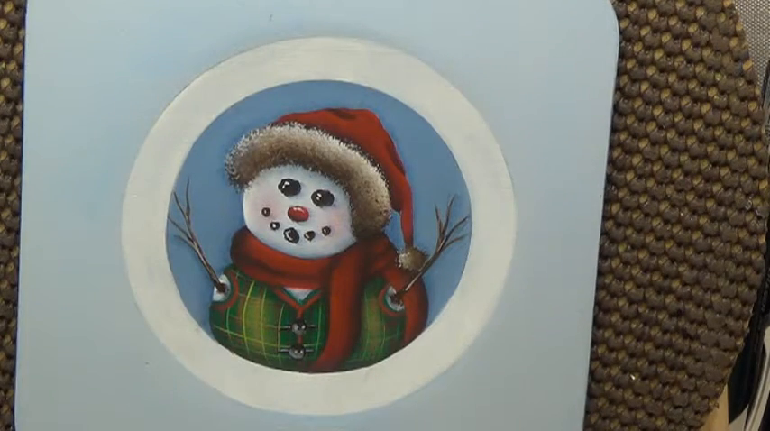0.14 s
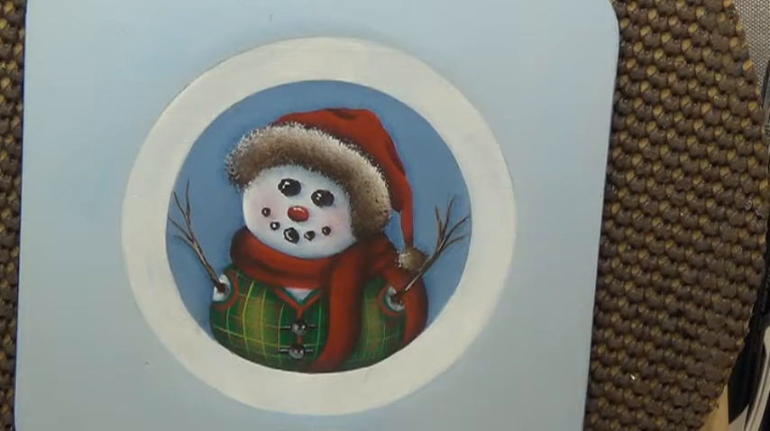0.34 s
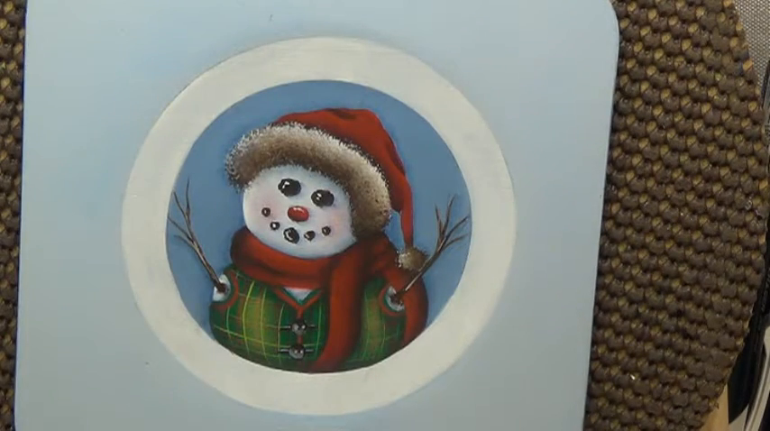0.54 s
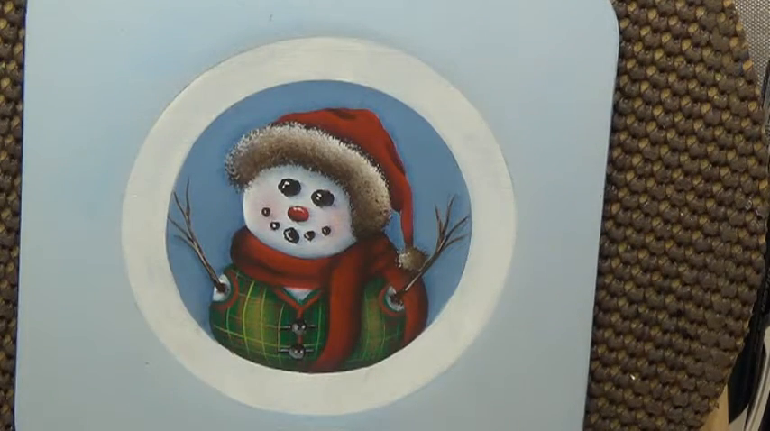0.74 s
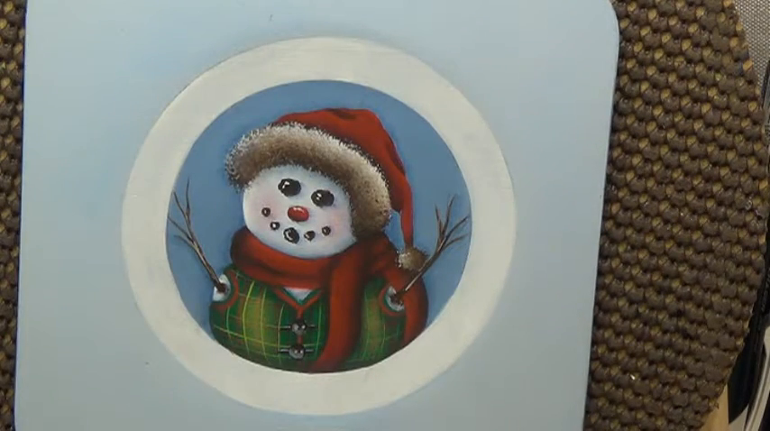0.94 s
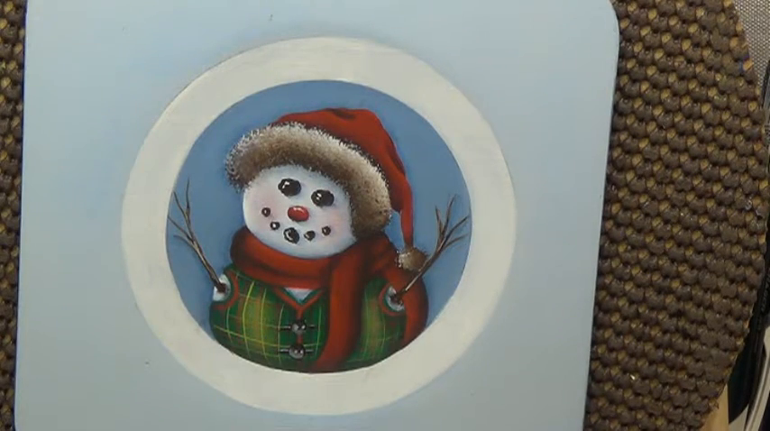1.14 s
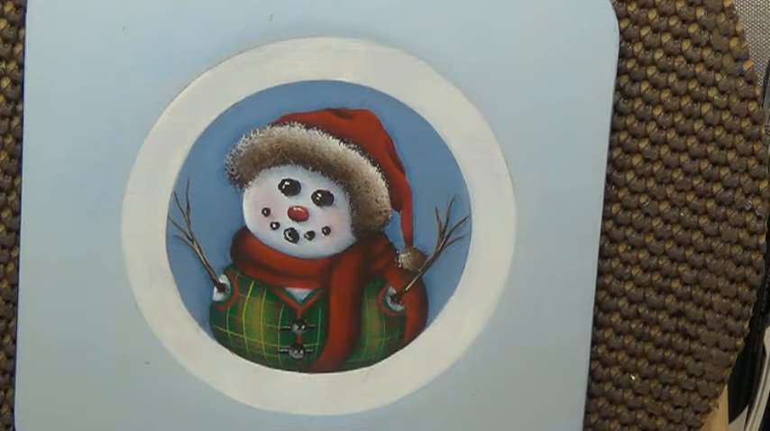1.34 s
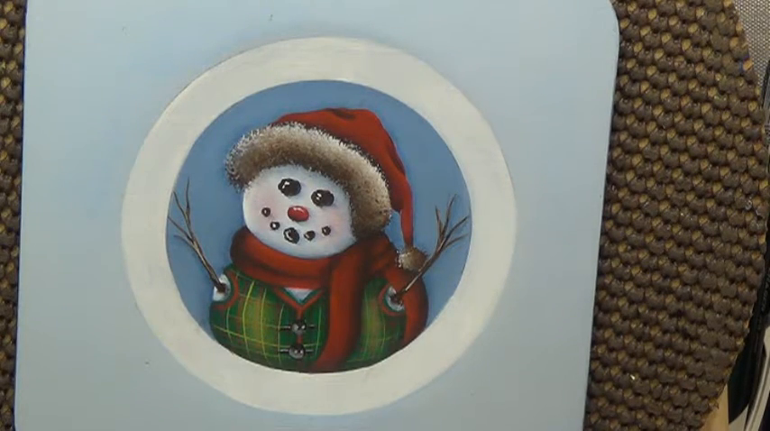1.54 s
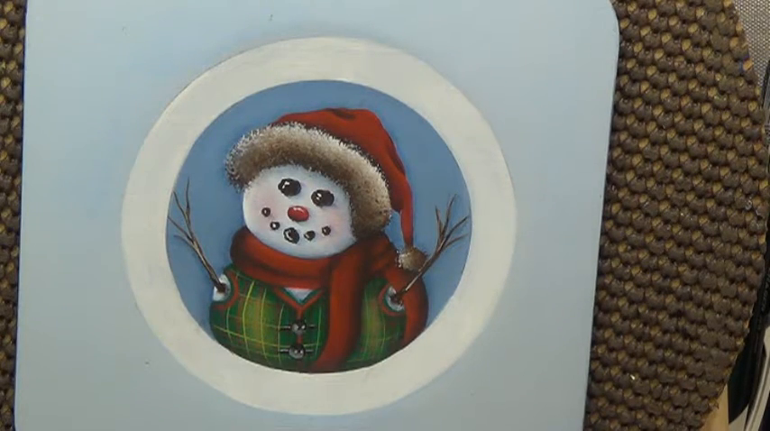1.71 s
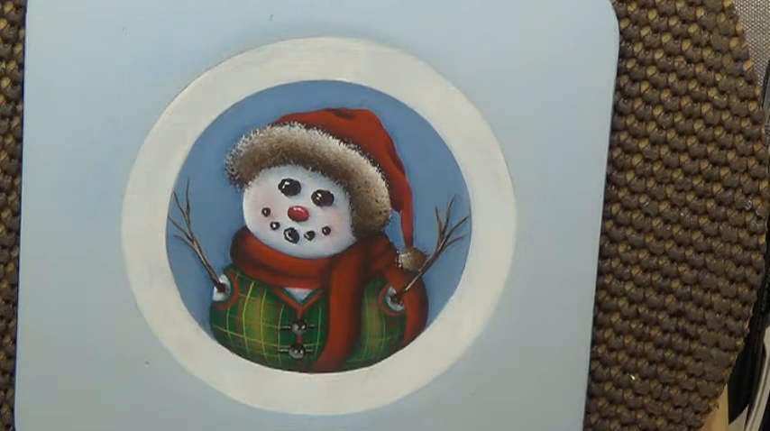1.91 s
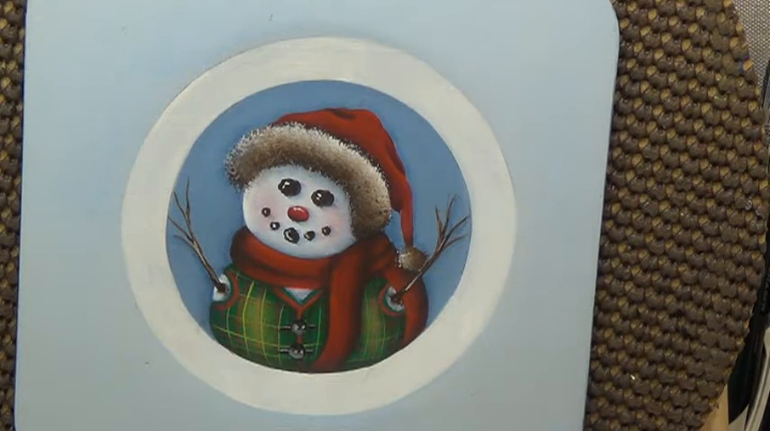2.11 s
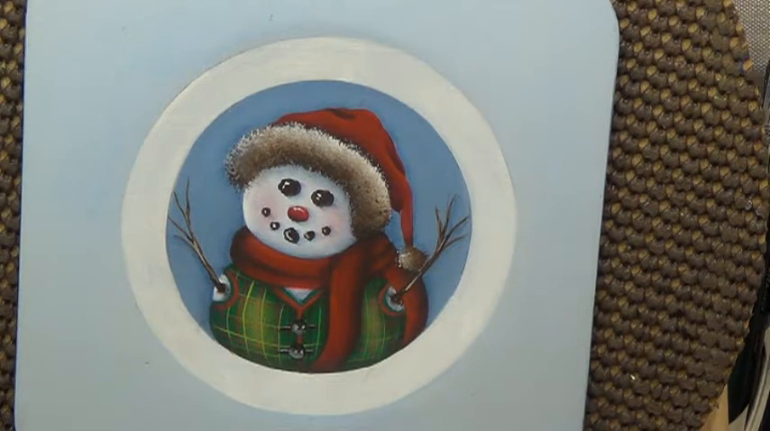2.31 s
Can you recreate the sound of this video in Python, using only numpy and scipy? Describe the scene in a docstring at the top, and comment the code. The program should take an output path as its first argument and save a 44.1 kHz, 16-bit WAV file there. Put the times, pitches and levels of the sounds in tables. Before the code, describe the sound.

Water sloshes and plops as a paintbrush is rinsed twice, followed by three dull bumps.

```python
"""A small room, where a paintbrush is rinsed in a container of water in two short runs.
First it is swished hard: the water throbs, gurgles and spatters as swarms of bubbles ring. Then it is
shaken lightly, with plops and sharp knocks of the handle ringing the container wall. Foam fizzes out and
three dull bumps of the brush follow, over faint hiss, hum and a thin electrical whine."""
import sys
import numpy as np
from scipy import signal
from scipy.fft import rfft, irfft, next_fast_len
from scipy.io import wavfile

SR = 44100
rng = np.random.default_rng(int(sys.argv[2]) if len(sys.argv) > 2 else 0)


def store_pcm(level_fs):
    """Save levels as 16-bit WAV."""
    pcm = np.round(np.clip(level_fs, -1, 1) * 32767).astype(np.int16)
    wavfile.write(sys.argv[1], SR, np.atleast_2d(pcm).T)


N = 108750

# spectrum of the finest bubbles, in spray and foam (frequency [Hz], level [dB])
FINE_BUBBLE_TONE = [(2700, -3), (3600, 1.5), (5000, -4.5), (5700, -4.5), (7000, -5), (9000, -14),
                    (12500, -7.5)]


def undb(db):
    return 10 ** (np.asarray(db) / 20)


def unit(x):
    """Scale to rms 1."""
    return x / np.sqrt(np.mean(x ** 2))


def at(hz, points):
    """Read (frequency [Hz], value) points on a log axis."""
    freqs, values = np.array(points, float).T
    return np.interp(np.log(np.maximum(hz, 1)), np.log(freqs), values)


def colour(x, points):
    """Equalise by (frequency [Hz], gain [dB]) points."""
    size = next_fast_len(len(x) + SR // 8)
    gain = undb(at(np.fft.rfftfreq(size, 1 / SR), points))
    return irfft(rfft(x, size) * gain, size)[:len(x)]


def fade(t, t60):
    return np.exp(-np.log(1000) * t / t60)


def add(out, start, x):
    """Mix x in at a time in s."""
    i = max(int(start * SR), 0)
    out[i:i + len(x)] += x[:max(len(out) - i, 0)]


def ring(t, hz, t60, rise_s, glide=0):
    """A fading sine with a soft attack; its pitch climbs by the fraction glide per t60."""
    t = np.maximum(t, 0)
    bend = 1 + glide * np.minimum(t / t60, 2) / 2
    return np.sin(2 * np.pi * hz * t * bend) * fade(t, t60) * (1 - np.exp(-t / rise_s))


def burst(t, t60, lo_hz, hi_hz):
    """A short puff of band-limited noise."""
    band = signal.butter(3, [lo_hz, min(hi_hz, SR / 2 - 1000)], "band", fs=SR, output="sos")
    puff = rng.standard_normal(len(t)) * fade(t, t60)
    return signal.sosfilt(band, puff) * np.sqrt(SR / 2 / (hi_hz - lo_hz))


def band_noise(lo_hz, hi_hz):
    """Steady noise in one band, rms 1."""
    band = signal.butter(2, [lo_hz, hi_hz], "band", fs=SR, output="sos")
    return unit(signal.sosfilt(band, rng.standard_normal(N)))


def bubbles(rate, tone, envelope, cycles, scatter_db, glide):
    """A swarm of random-sized bubbles, rate a second, riding a (time [s], level [dB]) envelope."""
    out = np.zeros(N)
    lo_hz, hi_hz = tone[0][0], tone[-1][0]
    for k, (when, pitch, strength, life) in enumerate(rng.random((int(rate * N / SR), 4))):
        hz = lo_hz * (hi_hz / lo_hz) ** pitch
        t60 = cycles * (.5 + life) / hz
        t = np.arange(int(t60 * SR) + 2) / SR
        db = at(hz, tone) - scatter_db * np.log(max(strength, .03))
        gain = undb(db) * np.sqrt(hz)  # makes up for the shorter ring of small bubbles
        add(out, (k + 2 * when) / rate, gain * ring(t, hz, t60, .5 / hz, glide))
    times, levels = np.transpose(envelope)
    return unit(out) * undb(np.interp(np.arange(N) / SR, times, levels, left=-120, right=-120))


def background():
    """A bed of faint hiss, wavering hum and thin electrical whine."""
    # hiss spectrum (frequency [Hz], level [dB])
    hiss_tone = [(18, -49), (30, -22), (118, 1.5), (280, -7), (600, -2), (1280, -10), (1500, -7),
                 (2830, -13), (3220, -13.5), (3980, -16), (4910, -12), (13700, -16), (16000, -41)]
    mid, side = (unit(colour(rng.standard_normal(N), hiss_tone)) for _ in range(2))
    hiss = mid + undb(-13) * side * np.array([[1], [-1]])
    hum = band_noise(113, 129)
    waver = 1 + .12 * band_noise(3, 40)
    whine = waver * np.sqrt(2) * np.sin(2 * np.pi * 15734 * np.arange(N) / SR)
    return undb(-55.5) * hiss + undb(-62.5) * hum + undb(-55) * whine


def gurgle():
    """Big bubbles stirred under by the brush ring low, with hardly any bend in pitch."""
    # surges of the gurgle (time [s], level [dB])
    surges = [(0, -39), (0.111, -38.5), (.15, -70), (0.174, -28.5), (.22, -42), (.28, -35), (0.337, -73),
              (0.363, -34), (0.449, -40.5), (.49, -61), (0.514, -37.5), (.6, -47.5), (.645, -57),
              (.69, -37), (.81, -48), (0.848, -38), (.89, -50), (.925, -36.5), (.965, -44), (1.01, -64),
              (1.27, -75), (1.3, -44.5), (1.42, -51), (1.52, -53.5), (1.8, -57.5)]
    # spectrum of the big bubbles (frequency [Hz], level [dB])
    tone = [(190, 4), (260, -22.5), (350, 7.5), (410, 8.5), (450, -12), (510, 9), (620, -4.5), (760, -3.5)]
    return undb(-2) * bubbles(500, tone, surges, cycles=44, scatter_db=2.5, glide=0.019)


def splashes():
    """Mid-sized bubbles chirp upward as the water sloshes, with a bright spray on top."""
    # envelopes of both runs (time [s], slosh level [dB], spray level [dB])
    swishes = [(0, -42.5, -62), (0.024, -33, -30.5), (.06, -41, -40), (0.094, -28.5, -34.5),
               (.15, -52, -84), (.18, -41.5, -45.5), (.21, -34.5, -51), (.255, -36, -38.5),
               (0.34, -54, -62.5), (0.376, -34.5, -38), (.398, -43, -60), (0.416, -39, -39),
               (.485, -48.5, -58), (.52, -47, -50), (0.538, -29, -39.5), (0.57, -45, -46.5),
               (0.61, -37, -39), (0.648, -50.5, -54.5), (0.762, -35, -44), (.80, -45, -60),
               (0.868, -28.5, -38), (0.899, -42.5, -53), (.93, -36, -41.5), (0.987, -33, -40),
               (1.04, -67, -66), (1.276, -75, -63.5), (1.293, -27, -43), (1.34, -57, -82),
               (1.392, -43, -50), (1.445, -47.5, -63), (1.525, -39, -47.5), (1.591, -45.5, -54.5),
               (1.622, -46.5, -40), (1.655, -52, -57.5), (1.687, -32.5, -36), (1.718, -38.5, -58),
               (1.745, -37.5, -40), (1.785, -39.5, -53.5), (1.83, -77, -62)]
    # spectrum of the sloshing bubbles (frequency [Hz], level [dB])
    slosh_tone = [(700, -2.5), (920, 2), (1170, 2), (1400, -1.5), (1700, -4.5), (2000, 0), (2600, -16)]
    times, slosh_db, spray_db = np.transpose(swishes)
    slosh = bubbles(900, slosh_tone, np.c_[times, slosh_db], cycles=30.3, scatter_db=2, glide=0.16)
    spray = bubbles(2500, FINE_BUBBLE_TONE, np.c_[times, spray_db], cycles=35, scatter_db=3, glide=0.098)
    return undb(-0.5) * slosh + undb(1.7) * spray


def strokes():
    """Each stroke heaves the water: a few low cycles that swell and die amid rough churning."""
    # throbs of the water (crest time [s], pitch [Hz], level [dB])
    throbs = [(.008, 126, -29), (0.092, 116, -44.5), (0.188, 127, -30.5), (0.273, 165, -32.5),
              (0.3, 144, -32.5), (0.361, 130, -29.5), (0.439, 160, -28), (0.468, 173, -37.5),
              (0.521, 130, -28.5), (0.596, 137, -27), (0.687, 131.3, -24.5), (.80, 150, -33.5),
              (0.85, 144, -26.5), (.923, 157, -26), (0.96, 182, -44.5)]
    swell_s, pitch_rise_per_s = 0.012, 1.3
    out, churn = np.zeros(N), undb(-14) * band_noise(98, 271)
    for crest, hz, db in throbs:
        t = np.arange(N) / SR - crest
        heave = np.sin(2 * np.pi * (hz * t * (1 + pitch_rise_per_s * t / 2) + rng.random()))
        out += undb(db) * np.exp(-(t / swell_s) ** 2) * (heave + churn)
    return out


def knocks():
    """The handle cracks against the wall and rings; the spot it hits favours low or high wall modes."""
    # handle hits (time [s], level [dB], low modes [dB], high modes [dB], handle ring [dB])
    hits = [(0.0349, -20.5, -11, 11, -22), (0.209, -21.5, -18, -7, -12), (0.2435, -25, -16, 5.5, 1),
            (0.3694, -32.5, -6, 19.5, -15), (0.415, -32.5, 22.5, -3, -27), (.5315, -33.5, 7, 14, -19),
            (.926, -28.5, 7, 3, -10), (.960, -25, 22, 12.5, -3), (1.282, -13.5, -16, 0.5, -2),
            (1.5019, -20, 5, 1, -13), (1.725, -16, 0, 0.5, -26), (1.8709, -13, -3, -5, 3)]
    # modes of the container wall (frequency [Hz], level [dB], t60 [s])
    wall_modes = [(393, -27.5, 0.048), (758, -21.5, 0.058), (919, -8, 0.051), (1170, 0.5, 0.029),
                  (1500, 1, 0.016), (1760, -9, 0.03), (2140, 1.5, 0.0077), (3115, -6, 0.029),
                  (3810, -3, 0.017), (4430, -12.5, 0.046), (4850, -10.5, 0.02), (6180, -43.5, 0.041),
                  (6350, -28.5, 0.034), (8680, -41, 0.0099)]
    low_edge_hz, high_edge_hz = (670, 1420), (3350, 3820)
    max_lag_s, detune = 0.000857, .012
    out, t = np.zeros(N), np.arange(SR // 8) / SR
    for start, db, low_db, high_db, handle_db in hits:
        crack = undb(-3.5 + high_db / 2) * burst(t, t60=0.023, lo_hz=600, hi_hz=6480)
        handle = undb(handle_db) * ring(t, hz=2646, t60=0.029, rise_s=0.0012)
        hit = crack + handle
        for k, (hz, mode_db, t60) in enumerate(wall_modes):
            spot_db = np.interp(hz, low_edge_hz, [low_db, 0]) + np.interp(hz, high_edge_hz, [0, high_db])
            lag = max_lag_s * rng.random()
            mode = ring(t - lag, hz * (1 + detune * rng.standard_normal()), t60, rise_s=0.000084)
            hit += (-1) ** k * undb(mode_db + spot_db) * mode
        add(out, start, undb(db) * hit)
    return out


def plops():
    """Each bubble snaps shut and rings briefly, rising in pitch; the smallest are mostly snap."""
    # single bubbles and drops (time [s], pitch [Hz], level [dB], t60 [s])
    drops = [(.085, 3550, -24.5, 0.093), (.172, 504, -28.5, 0.055), (.189, 805, -20, 0.039),
             (0.21, 7530, -28, 0.022), (0.211, 1032, -22, 0.081), (0.369, 7430, -21, 0.017),
             (.376, 897, -26, 0.044), (0.422, 5070, -25, 0.021), (0.456, 1980, -29.5, 0.046),
             (0.459, 3750, -22.5, 0.012), (0.488, 1274, -28.5, 0.05), (.489, 4670, -28.5, 0.021),
             (0.533, 6730, -22.5, 0.025), (0.6049, 1162, -16.5, 0.044), (.55, 341, -31.5, 0.15),
             (0.586, 358, -27, 0.12), (0.696, 880, -27.5, 0.048), (.708, 3620, -30, 0.04),
             (.746, 8100, -26, 0.023), (0.764, 1130, -18.5, 0.019), (.810, 1200, -22.5, 0.028),
             (0.856, 1163, -27.5, 0.08), (.869, 1310, -27, 0.023), (.893, 4900, -27.5, 0.068),
             (1.318, 1130, -20, 0.032), (1.283, 808, -27, 0.12), (1.304, 2710, -21, 0.029),
             (1.354, 1826, -7.5, 0.02), (1.361, 2170, -17, 0.023), (1.389, 1323, -20.5, 0.026),
             (1.397, 1310, -21.5, 0.023), (1.401, 9900, -35, 0.016), (1.4116, 4780, -19.5, 0.016),
             (1.42, 3500, -26, 0.028), (1.424, 936, -26.5, 0.047), (1.465, 1413, -18, 0.057),
             (1.473, 1210, -12, 0.019), (1.504, 1170, -10.5, .032), (1.5595, 1700, -14, 0.021),
             (1.616, 1786, -18.5, .028), (1.55, 9700, -36, 0.014), (1.570, 9000, -39, 0.014),
             (1.629, 7670, -30.5, 0.012), (1.637, 979, -21.5, 0.057), (1.671, 1450, -22, 0.033),
             (1.676, 1800, -19, 0.05), (1.697, 3166, -29, 0.047), (1.779, 2160, -23, 0.021)]
    # how much of a bubble is snap (pitch [Hz], share of energy [0-1])
    snap_share = [(1500, .08), (3500, .25), (7500, .7)]
    out, t = np.zeros(N), np.arange(SR // 8) / SR
    for start, hz, db, t60 in drops:
        share = at(hz, snap_share)
        snap = np.sqrt(share) * burst(t, t60, hz * 0.77, hz * 1.29)
        chirp = 1.006 * np.sqrt(1 - share) * ring(t, hz, t60, rise_s=0.00055, glide=0.078)
        add(out, start, undb(db) * (chirp + snap))
    return out


def foam():
    """Last drips and bursting foam leave a fine fizz after the second run."""
    # the fizz dying away (time [s], level [dB])
    fizz = [(1.80, -54), (1.9, -55.5), (2.02, -56.5), (2.14, -62), (2.32, -62.5), (2.46, -68)]
    return undb(-1.5) * bubbles(600, FINE_BUBBLE_TONE, fizz, cycles=20, scatter_db=5, glide=0.07)


def bumps():
    """Soft blows of the brush ring only low modes, with a faint tick of contact."""
    # dull blows (time [s], level [dB])
    blows = [(2.109, -16), (2.277, -18), (2.4555, -18.5)]
    # body of a bump (frequency [Hz], level [dB], t60 [s], delay [s])
    low_modes = [(115, -23, 0.17, 0.0097), (199, -7, 0.061, 0.00099), (354, 1.5, 0.071, .005),
                 (483, 6.5, 0.024, 0.00011), (560, -5, 0.039, 0), (704, -9.5, 0.037, 0.012),
                 (806, -9, 0.027, 0.0017), (983, -6.5, 0.023, 0.0024)]
    # the soft contact passes little treble (frequency [Hz], gain [dB])
    soft_contact = [(1100, 0.5), (1500, 3), (3000, -25)]
    out, t = np.zeros(N), np.arange(SR // 3) / SR
    for start, db in blows:
        body = sum(undb(mode_db) * ring(t - delay, hz, t60, rise_s=0.0015)
                   for hz, mode_db, t60, delay in low_modes)
        tick = undb(-25.5) * burst(t, t60=0.043, lo_hz=670, hi_hz=8400)
        add(out, start, undb(db) * (colour(body, soft_contact) + tick))
    return out


def room_tail():
    """The room's short diffuse tail: noise that dies at its own rate in each band."""
    # reverb bands (centre [Hz], level [dB], t60 [s])
    bands = [(150, -13, 0.22), (386, -10.5, 0.17), (990, -13, 0.19), (2530, -11.5, 0.18),
             (4160, -16.5, 0.28), (7000, -14, 0.21), (11900, -6.5, 0.21)]
    predelay_s, build_s = 0.006, 0.01
    t = np.arange(SR // 2) / SR
    onset = np.clip((t - predelay_s) / build_s, 0, 1)
    out, centres = 0, [row[0] for row in bands]
    spectrum, freqs = rfft(rng.standard_normal(len(t))), np.fft.rfftfreq(len(t), 1 / SR)
    for share, (_, db, t60) in zip(np.eye(len(bands)), bands):
        noise = irfft(spectrum * at(freqs, list(zip(centres, share))), len(t))
        shape = fade(t, t60) * onset
        out = out + undb(db) * noise * shape / np.sqrt(np.sum(shape ** 2))
    return out


def place(source, balance):
    """Set a source in the room: wall echoes, a diffuse tail and its lean between the channels."""
    # early reflections off nearby walls (delay [s], level [dB])
    echoes = [(0.0185, -20.5), (0.03, -18.5), (.049, -33)]
    # their dull tone (frequency [Hz], gain [dB])
    echo_tone = [(500, 3.5), (1200, -16.5), (4000, -23)]
    width_db = -21.5
    near, dull = source.copy(), colour(source, echo_tone)
    for delay, db in echoes:
        add(near, delay, undb(db) * dull)
    mid, side = (signal.fftconvolve(source, room_tail())[:N] for _ in range(2))
    channels = []
    for sign in (1, -1):
        lean = [(hz, sign * db / 2) for hz, db in balance]
        channels.append(colour(near + mid + sign * undb(width_db) * side, lean))
    return np.array(channels)


def scene():
    """The container stands a little to the right, close to the microphone."""
    # panning of the knocks and bumps (frequency [Hz], left minus right [dB])
    hit_balance = [(60, -11), (110, -9), (200, -2.5), (380, -2.5), (700, -2.5), (1290, -4.5), (2380, -2),
                   (4400, -2), (8120, -3), (15000, -11)]
    # panning of the water (frequency [Hz], left minus right [dB])
    water_balance = [(60, -3), (110, -7.0), (200, -9.5), (380, -3), (700, -4.5), (1290, -4.5), (2380, -3.0),
                     (4400, -2.5), (8120, -5.5), (15000, -1.5)]
    hits = place(knocks() + bumps(), hit_balance)
    water = place(plops() + strokes() + gurgle() + splashes() + foam(), water_balance)
    return hits + water + background()


def record(dry):
    """The recorder thins the deep bass and cuts the top."""
    low_cut_hz, top_hz = 66, 16200
    thin = signal.sosfilt(signal.butter(3, low_cut_hz, "high", fs=SR, output="sos"), dry)
    return signal.sosfilt(signal.ellip(8, .2, 70, top_hz, fs=SR, output="sos"), thin)


dry = scene()
out = record(dry)
store_pcm(out)
```